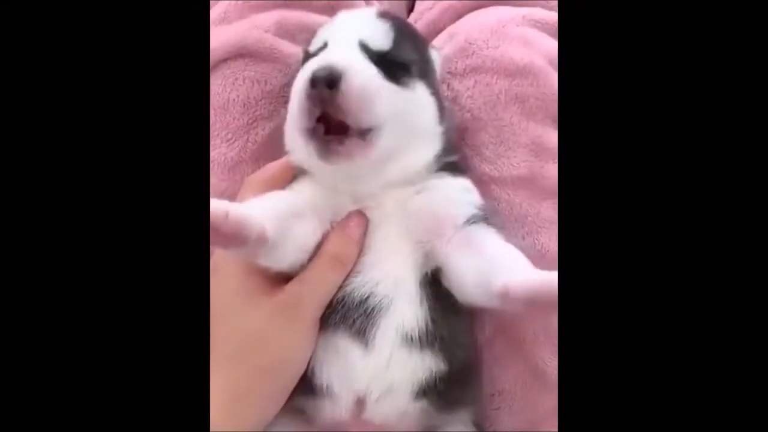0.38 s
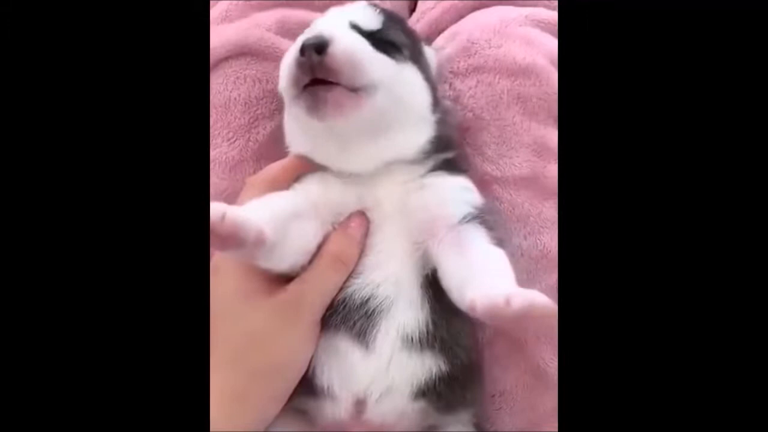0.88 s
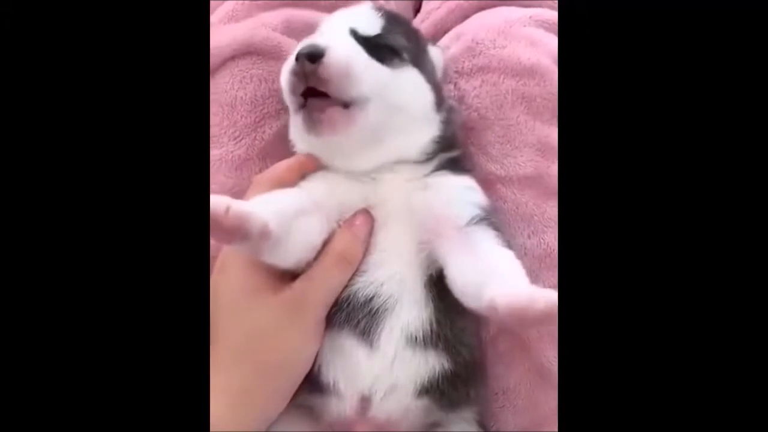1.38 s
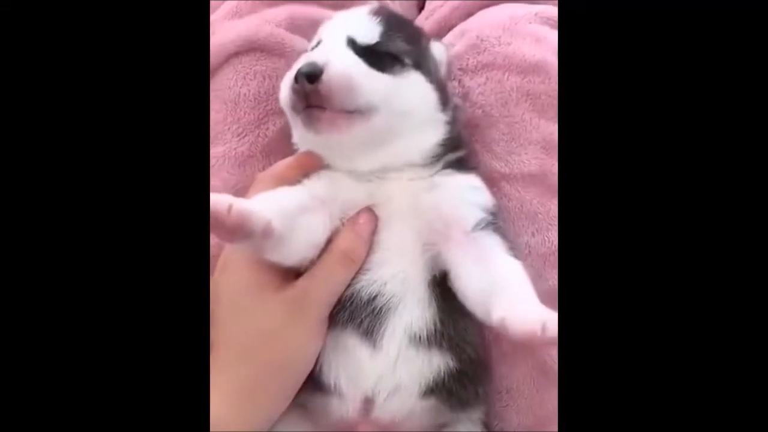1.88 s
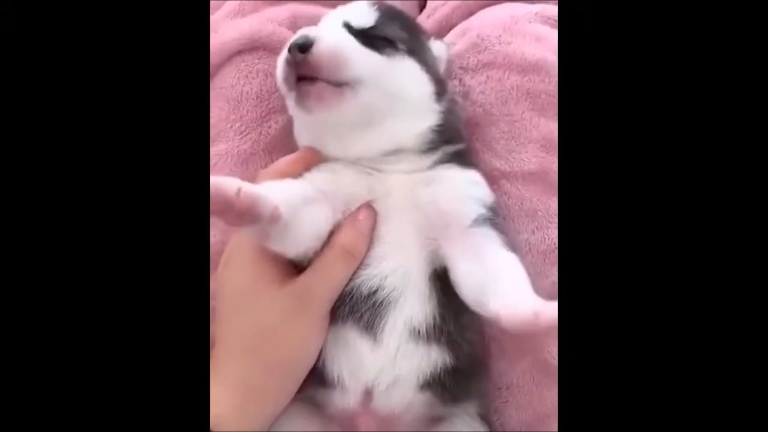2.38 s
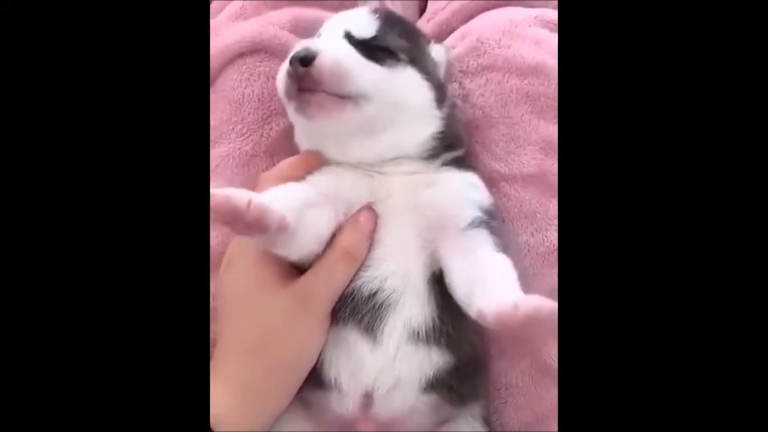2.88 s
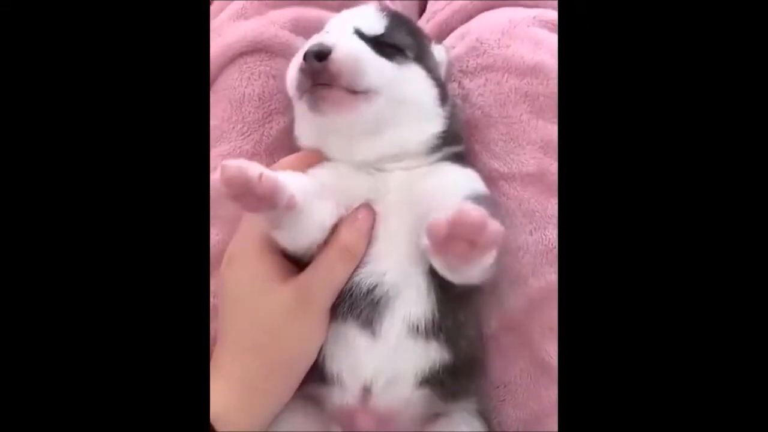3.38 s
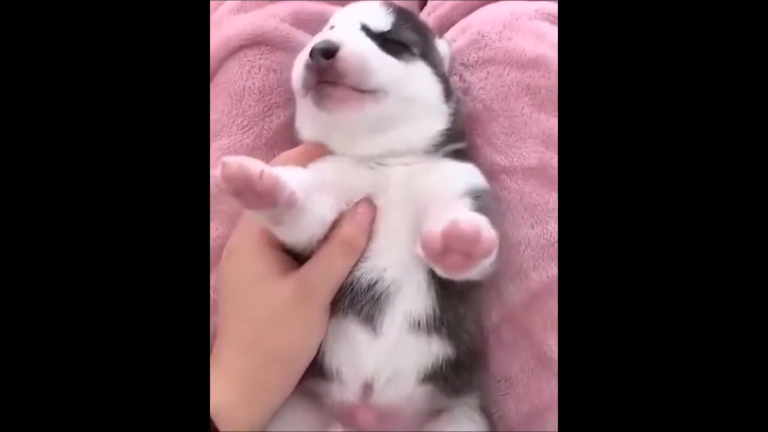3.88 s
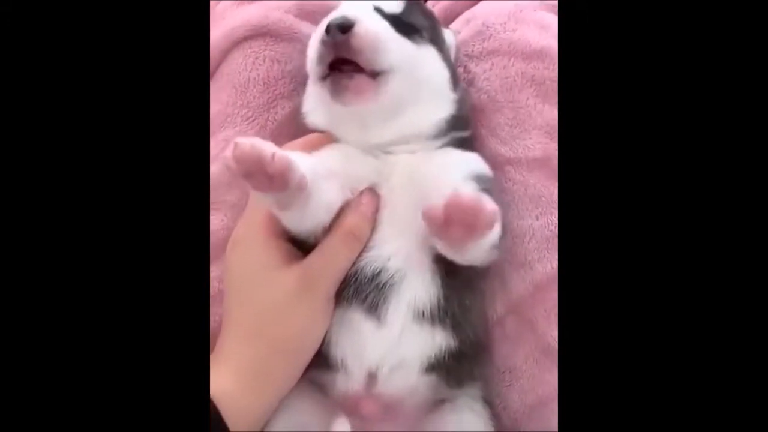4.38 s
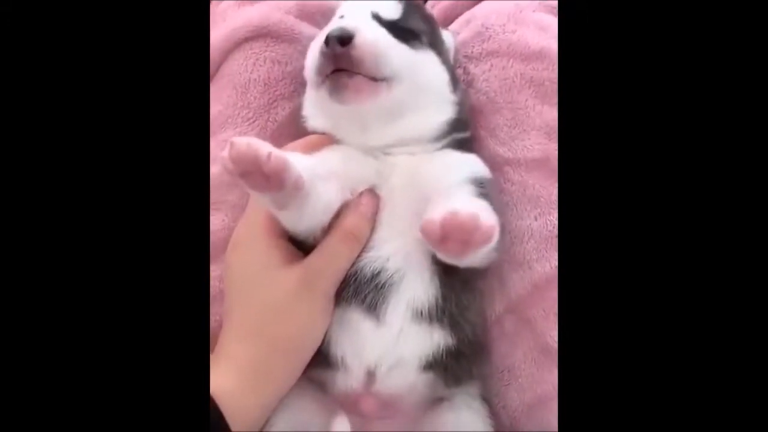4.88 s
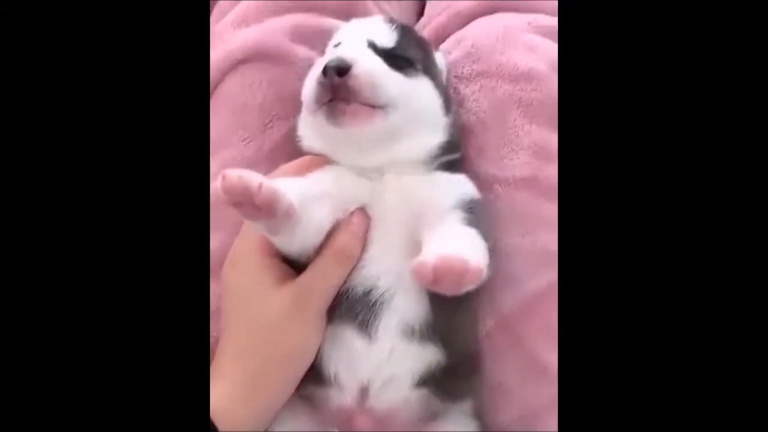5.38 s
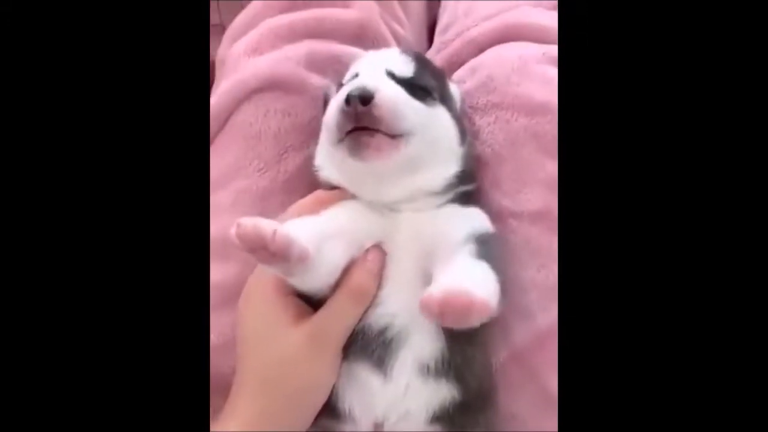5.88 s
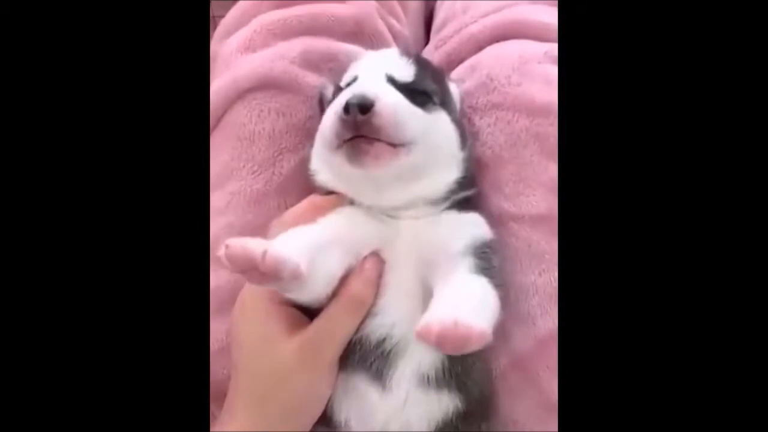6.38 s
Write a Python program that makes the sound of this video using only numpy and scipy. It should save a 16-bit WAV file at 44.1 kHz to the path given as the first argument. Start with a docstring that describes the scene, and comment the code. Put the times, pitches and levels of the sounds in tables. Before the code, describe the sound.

A very young puppy gives five short, close howls, each yelping high, thinning to a whistle, then breaking into a lower, raspy moan indoors.

```python
"""A very young puppy howls five times, close to a phone in a quiet room.
Three calls start with a creak; all yelp, hold a thin whistle, break into a lower voice and end in a rasp.
The voice is a stack of sine partials that waver, plus breath noise puffed once a cycle.
A soft room answers briefly as a fading noise tail; steady air noise and a mains hum sit underneath."""
import sys
import numpy as np
from scipy import signal
from scipy.fft import rfft, irfft
from scipy.io import wavfile
from scipy.ndimage import uniform_filter1d

SR = 44100
rng = np.random.default_rng(int(sys.argv[2]) if len(sys.argv) > 2 else 0)


def voltage_ratio(decibels):
    """Convert decibels (scalar or array-like) to amplitude ratios, 20 dB per decade."""
    exponent = np.asarray(decibels, float) / 20
    return 10 ** exponent


def to_wav(s):
    """Save 16-bit WAV."""
    ch = np.atleast_2d(s).T  # columns
    pcm = np.round(np.clip(ch, -1, 1) * 32767)  # PCM
    wavfile.write(sys.argv[1], SR, pcm.astype(np.int16))


N = 287532  # length in samples, about 6.5 s


def unit(x):
    """Scales a sound to rms 1."""
    return x / np.sqrt(np.mean(x ** 2))


def at(table, hz):
    """Reads dB from a (Hz, dB) table, in straight lines on a log-frequency axis."""
    table_hz, db = np.transpose(table)
    return np.interp(np.log(hz), np.log(table_hz), db)


def noise(table):
    """Random noise shaped by a spectrum table, rms 1."""
    hz = np.maximum(np.arange(N // 2 + 1) * SR / N, 1)
    return unit(irfft(rfft(rng.standard_normal(N)) * voltage_ratio(at(table, hz)), N))


def wobble(hz):
    """Smooth random movement no faster than about hz, rms 1."""
    lowpass = signal.butter(2, hz, fs=SR, output="sos")
    return unit(signal.sosfilt(lowpass, rng.standard_normal(N)))


# Colour of the room air; only the shape counts. Each row: frequency in Hz, density in dB per Hz.
AIR_COLOUR = [(12, -47.5), (20, -29), (36, -11.5), (102, -13), (129, -19.5), (174, -22.5), (273, -18.5),
              (296, -19.5), (386, -20), (441, -26), (883, -26), (3090, -41.5), (11700, -46), (15300, -78),
              (22000, -120)]


def air():
    """Room air: shaped noise whose level slowly swells and sinks."""
    level_db, swell_db, swell_hz = -62.5, 1.7, 2.2
    return voltage_ratio(level_db + swell_db * wobble(swell_hz)) * noise(AIR_COLOUR)


# Mains hum. Each row: frequency in Hz, middle rms level in dB.
HUM_TONES = [(100.2, -65)]


def mains_hum():
    """Mains hum: a steady sine pitch with a slightly wavering level."""
    t = np.arange(N) / SR
    waver_db, waver_hz = 0.59, 3
    hum = 0
    for hz, db in HUM_TONES:
        level = np.sqrt(2) * voltage_ratio(db + waver_db * wobble(waver_hz))
        hum = hum + level * np.sin(2 * np.pi * hz * t)
    return hum


def room(x):
    """Room echo: many dense reflections, heard as a dull noise tail that fades quickly."""
    level_db, t60_s, top_hz, fade_in_s = -22, 0.33, 3220, 0.0028
    t = np.arange(int(.6 * SR)) / SR
    tail = rng.standard_normal(len(t)) * np.exp(-np.log(1000) * t / t60_s)
    tail *= np.clip(t / fade_in_s, 0, 1)
    tail = signal.sosfilt(signal.butter(1, top_hz, fs=SR, output="sos"), tail)
    return voltage_ratio(level_db) * signal.fftconvolve(x, tail / np.linalg.norm(tail))[:N]


# Bands the nose swallows. Each row: centre in Hz, width in Hz, share taken out from 0 to 1.
NOSE_BANDS = [(2680, 350, .7), (3950, 600, .75)]


def nose(x):
    """The nasal branch of the airway takes a share out of each band where it resonates."""
    for hz, width_hz, share in NOSE_BANDS:
        x = x - share * signal.lfilter(*signal.iirpeak(hz, hz / width_hz, fs=SR), x)
    return x


# Colour of the breath; only the shape counts. Each row: frequency in Hz, density in dB per Hz.
BREATH_COLOUR = [(530, -41), (900, -25.5), (1190, -3.5), (1340, -2), (1810, -2.5), (2100, -38.5),
                 (2470, -31), (2720, -20), (3000, -21), (3720, -29), (4050, -34), (6640, -32),
                 (7640, -31.5), (9680, -32), (11700, -55.5), (15300, -75), (22000, -120)]


def breath_hiss(phase):
    """Breath: noise that swells once per voice cycle and crackles a little, rms 1."""
    puff_depth, crackle_db, crackle_hz = 0.13, 1, 50
    puffs = noise(BREATH_COLOUR) * (1 + puff_depth * np.cos(phase))
    puffs *= voltage_ratio(crackle_db * wobble(crackle_hz))
    highpass = signal.butter(4, 2400, "high", fs=SR, output="sos")
    return unit(nose(signal.sosfilt(highpass, puffs)))


# Head voice, third and fourth partial against the treble. Each row: frequency in Hz, level in dB.
HEAD_PARTIALS = [(2300, -20), (3500, -0.5), (4050, 2.5), (4300, -6.5), (4600, -5), (5300, -2.5),
                 (7000, -10.5)]


def head(rows):
    """Head voice, thin and high: two partials are given, the third and fourth follow the treble."""
    s, hz, first, second, treble = np.transpose(rows)
    third = treble + at(HEAD_PARTIALS, 3 * hz)
    fourth = treble + at(HEAD_PARTIALS, 4 * hz) - 6
    silent = [0 * s - 120] * 3  # partials five to seven
    return np.array([s, hz, first, second, third, fourth, *silent, treble])


def chest(rows, shape, ring=(3000, 500, -10)):
    """Chest voice, low and full: throat and mouth resonances share the level among partials 2 to 4."""
    first_db, throat_hz, throat_db, mouth_width_hz, fall_db = shape
    ring_hz, ring_width_hz, ring_db = ring
    rows = np.transpose(rows)
    s = np.arange(rows[0, 0], rows[0, -1], .002)
    hz, db, mouth_hz, treble = (np.interp(s, rows[0], column) for column in rows[1:])

    def peak(f, centre, width):
        return 1 / (1 + (2 * (f - centre) / width) ** 2)

    f = hz * np.array([[2], [3], [4]])
    power = peak(f, mouth_hz, mouth_width_hz) + voltage_ratio(2 * throat_db) * peak(f, throat_hz, 100)
    power = power * voltage_ratio(-2 * fall_db * np.log2(np.maximum(f / mouth_hz, 1)))
    power = voltage_ratio(2 * db) * power / power.sum(axis=0)
    power = np.vstack([power, np.zeros((3, len(s)))])
    # a higher ring lifts partials 2 to 7; squaring makes its peak narrower
    f = hz * np.arange(2, 8)[:, None]
    power = power + voltage_ratio(2 * (treble + ring_db)) * peak(f, ring_hz, ring_width_hz) ** 2
    # the first partial sinks only where the level is far below its loudest
    fade = np.clip(db - db.max() + 14, -30, 0)
    return np.array([s, hz, first_db + fade, *(10 * np.log10(power)), treble])


# Creaky starts. Each row: start in seconds, length in seconds, pitch in Hz, level at the end in dB,
# mouth resonance in Hz.
CREAK_STARTS = [(2.206, .025, 340, -35.5, 1130), (4.229, .034, 383, -38, 1100),
                (5.503, .04, 393, -35.5, 1217)]
# One row: first partial in dB, throat resonance in Hz, its dB against the mouth's, mouth width in Hz,
# fall above the mouth in dB per octave (below zero it rises).
CREAK_RESONANCES = (-44, 758, -16, 395.5, -12)


def creaks():
    """Creaks: short, very rough chest notes that swell at a steady pitch."""
    swell_db, treble_db = 5.5, -31  # treble against the level at the end
    roughness, breath_db = .8, 0
    stretches = []
    for start, length, hz, db, mouth_hz in CREAK_STARTS:
        rows = [(start, hz, db - swell_db, mouth_hz, db + treble_db),
                (start + length, hz, db, mouth_hz, db + treble_db)]
        stretches.append((chest(rows, CREAK_RESONANCES), roughness, breath_db))
    return stretches


# Run-ups to the yelps, one list each. Each row: time in seconds, pitch in Hz, first partial in dB,
# second partial in dB, treble in dB.
RUNUP_NOTES = [
    [(0.414, 1161, -43.5, -58.5, -60), (0.42, 1058, -28.5, -58.5, -63), (0.424, 1110, -29.5, -65, -51),
     (0.434, 1347, -27.5, -36.5, -40), (0.438, 1315, -16.5, -40, -46)],
    [(0.443, 1181, -25.5, -18.5, -28.5), (0.451, 1132, -30.5, 1.5, -28.5), (0.459, 1243, -22, -22, -37.5)],
    [(2.238, 931.5, -38, -52, -71.5), (2.254, 952.2, -29.5, -26.5, -49), (2.262, 1024, -25.5, -27.5, -46.5),
     (2.27, 1209, -25, -31, -39)],
    [(3.07, 1073, -44.5, -62, -89.5), (3.076, 1050, -39.5, -54.5, -77), (3.084, 1082, -29, -57, -83.5),
     (3.095, 1061, -52, -76.5, -67.5)],
    [(3.101, 1057, -29, -55.5, -69.5), (3.109, 897, -38, -37, -66.5), (3.117, 901.3, -31, -29, -44.5),
     (3.131, 1053, -28.5, -28.5, -43), (3.137, 1101, -32.5, -43, -44.5)],
    [(4.275, 751, -32.5, -32.5, -60), (4.283, 770.4, -32.5, -35, -62), (4.303, 1008, -32.5, -27.5, -46.5),
     (4.329, 1195, -29, -15.5, -27.5), (4.343, 1192, -23.5, -16, -28), (4.351, 1232, -25.5, -23, -22)],
    [(5.551, 758.2, -28, -36, -59), (5.561, 812.6, -32.5, -34, -61), (5.573, 988.5, -32, -33, -47),
     (5.595, 1122, -28, -20, -35.5), (5.613, 1165, -35.5, -17, -30), (5.628, 1155, -26, -22, -23.5)],
]


def runups():
    """Run-ups: a slightly rough, breathy head voice that leads to the yelp."""
    return [(head(rows), .008, -.6) for rows in RUNUP_NOTES]  # roughness, breath in dB


# Five yelps that thin to a whistle, and one brief flip back into head voice, one list each.
# Each row: time in seconds, pitch in Hz, first partial in dB, second partial in dB, treble in dB.
HIGH_NOTES = [[(0.464, 1475, -9.5, -23, -26), (0.478, 1532, -7, -25.5, -24), (0.488, 1646, -2, -46, -29),
              (0.496, 1698, -2, -46, -22.5), (0.506, 1750, -5, -36, -35), (0.518, 1573, -15.5, -68, -41.5),
              (0.524, 1615, -11.5, -48, -28), (0.532, 1702, -14, -55, -40), (0.54, 1800, -17.5, -39, -31),
              (0.546, 1805, -12.5, -37, -41), (0.556, 1700, -11, -64, -46), (0.564, 1610, -13, -48, -27),
              (0.582, 1746, -16, -45, -53), (0.608, 1650, -16.5, -57, -48), (0.63, 1864, -31.5, -48, -61),
              (0.642, 1707, -27.5, -55, -65), (0.668, 1865, -35.5, -46, -75),
              (0.682, 1844, -40.5, -47, -95), (0.7, 1810, -41, -53, -76)] + [(0.72, 1775, -45, -63, -79),
              (0.77, 1750, -40, -62, -96), (0.794, 1752, -41, -65.5, -87), (0.886, 1726, -38.5, -56.5, -91),
              (0.934, 1727, -44, -61, -82), (0.994, 1705, -42, -57.5, -90), (1.05, 1704, -38.5, -52, -79),
              (1.058, 1600, -36, -60, -69), (1.09, 1466, -35.5, -50, -66),
              (1.116, 1423, -23.5, -35.5, -59.5), (1.208, 1452, -26, -42, -57),
              (1.238, 1353, -21, -47, -59), (1.268, 1148, -31.5, -45, -57)],
              [(2.275, 1462, -9.5, -31.5, -24.5), (2.289, 1506, -7, -23.5, -16),
              (2.301, 1387, -13.5, -13, -19), (2.311, 1523, -9, -21.5, -19), (2.323, 1511, -10, -15, -15.5),
              (2.333, 1518, -15, -48.5, -18.5), (2.341, 1536, -17.5, -28, -25.5),
              (2.367, 1516, -23.5, -43, -32), (2.383, 1398, -29.5, -38, -48),
              (2.4, 1382, -28.5, -39, -50)] + [(2.42, 1321, -30.5, -41, -48),
              (2.448, 1308, -35, -43, -52.5), (2.462, 1306, -32.5, -39.5, -57), (2.54, 1301, -33, -41, -60),
              (2.564, 1228, -35, -44, -57.5), (2.602, 1272, -30.5, -43.5, -59),
              (2.634, 1279, -32.5, -53, -58), (2.66, 1247, -36, -46, -68), (2.677, 1220, -31.5, -49, -61)],
              [(3.143, 1410, -23, -35, -31), (3.149, 1446, -13, -24.5, -25.5),
              (3.161, 1548, -2.5, -17.5, -20.5), (3.177, 1558, -5, -26, -15.5),
              (3.185, 1472, -12.5, -41.5, -19.5), (3.191, 1568, -4.5, -32.5, -21),
              (3.197, 1633, -4.5, -57.5, -30), (3.201, 1664, -6, -48, -32.5),
              (3.213, 1664, -12, -61, -34.5), (3.235, 1565, -42, -58, -35.5), (3.239, 1604, -24, -68, -35),
              (3.243, 1626, -19, -56, -33.5), (3.257, 1554, -27.5, -38, -35.5),
              (3.281, 1422, -31.5, -40.5, -43),
              (3.3, 1398, -26, -41, -47.5)] + [(3.32, 1368, -32.5, -45, -51.5),
              (3.412, 1343, -33.5, -46, -55.5), (3.47, 1340, -30, -48, -56), (3.502, 1379, -30, -47, -56),
              (3.526, 1368, -29, -44.5, -63), (3.548, 1377, -30, -52, -59.5),
              (3.568, 1351, -36, -47, -62.5), (3.584, 1346, -30.5, -57, -60),
              (3.65, 1338, -33.5, -49, -58)], [(4.356, 1483, -14, -34, -23.5),
              (4.362, 1547, -4, -34.5, -25.5), (4.372, 1542, -12.5, -36, -29.5),
              (4.386, 1524, -33, -53, -36.5), (4.408, 1543, -23, -60, -33.5),
              (4.418, 1522, -24.5, -56, -45), (4.432, 1385, -30, -40, -47.5),
              (4.474, 1307, -33.5, -40, -57), (4.524, 1333, -34, -40, -57.5),
              (4.558, 1379, -27.5, -52, -65), (4.58, 1306, -34, -41, -61.5), (4.624, 1338, -24.5, -51, -65),
              (4.662, 1330, -32, -45, -64), (4.724, 1322, -31.5, -53, -64.5), (4.745, 1322, -38, -39, -63)],
              [(5.634, 1473, -23, -37, -30), (5.642, 1458, -19, -39, -34.5), (5.656, 1543, -17.5, -52, -36),
              (5.69, 1520, -27, -45.5, -48.5), (5.722, 1330, -29, -43, -49.5),
              (5.758, 1299, -37, -46.5, -58), (5.802, 1363, -30, -43.5, -65), (5.832, 1401, -30, -58, -66),
              (5.848, 1360, -29.5, -47, -60.5), (5.904, 1349, -33, -50, -67.5),
              (5.927, 1314, -30, -55, -61)], [(5.97, 1326, -24.5, -51, -60), (5.984, 1334, -30, -64, -60),
              (5.996, 1347, -27, -72, -59)]]


def yelps_and_flip():
    """Five yelps that thin to a whistle, and one brief flip back up, all in a clear head voice."""
    return [(head(rows), .002, -1.5) for rows in HIGH_NOTES]  # roughness, breath in dB


# Low stretches, one list each. Each row: time in seconds, pitch in Hz, level in dB,
# mouth resonance in Hz, treble in dB.
CHEST_NOTES = [
    [(1.274, 515, -29, 1520, -58), (1.284, 497, -21.5, 1480, -55), (1.293, 473, -27, 1450, -56)],
    [(1.3, 926.5, -36, 1800, -52), (1.315, 880, -29.5, 1693, -58), (1.33, 818, -19.5, 1630, -63),
     (1.355, 760, -30.5, 1570, -56), (1.37, 714, -34.5, 1498, -54.5),
     (1.395, 660, -36, 1882, -56)] + [(1.42, 611.2, -36, 1576, -57), (1.432, 594, -33.5, 1530, -55.5),
     (1.46, 599, -35.5, 1500, -58.5), (1.492, 635, -34, 1610, -57), (1.512, 728, -28.5, 1570, -57.5),
     (1.54, 734, -35.5, 1494, -54), (1.58, 742, -31, 1480, -57), (1.628, 698, -31, 1410, -59),
     (1.646, 698, -25, 1364, -56), (1.672, 713, -28, 1420, -52.5), (1.706, 690, -30, 1365, -57.5),
     (1.72, 678, -34.5, 1403, -59.5), (1.762, 590.0, -34.5, 1470, -60), (1.818, 532.6, -33, 1552, -60),
     (1.866, 485, -33.5, 1518, -61.5), (1.9, 463, -39, 1470, -59)],
    [(2.684, 531.2, -29.5, 1558, -54.5), (2.72, 504.7, -30, 1520, -54.5), (2.754, 534.2, -28, 1637, -53.5),
     (2.766, 622.6, -35.5, 1614, -52), (2.788, 617.4, -33.5, 1540, -63), (2.824, 432.0, -39.5, 1480, -61)],
    [(3.655, 655.4, -30.5, 1820, -53), (3.697, 644.5, -30.5, 1860, -54), (3.737, 628.4, -23, 1910, -54),
     (3.757, 612.2, -24, 1844, -50.5), (3.779, 599.9, -22.5, 1800, -49), (3.815, 633.7, -24.5, 1896, -46),
     (3.825, 561.9, -21.5, 1700, -59), (3.863, 528.3, -30.5, 1678, -52), (3.889, 413.8, -34, 1680, -59),
     (3.933, 375, -30.5, 1570, -58.5), (3.957, 323.3, -39.5, 1459, -52.5), (3.988, 279.7, -45.5, 1512, -75)],
    [(4.75, 647.8, -29, 1885, -52), (4.764, 645.2, -28.5, 1880, -56), (4.782, 642.3, -26, 1773, -53),
     (4.79, 578.7, -23, 1773, -58), (4.85, 581, -23.5, 1738, -53.5), (4.88, 592.8, -22.5, 1790, -55),
     (4.93, 577.8, -23.5, 1796, -53.5), (4.96, 540.5, -26, 1840, -49.5), (4.986, 572, -26, 1745, -53.5),
     (5.01, 527.6, -25, 1820, -48), (5.108, 492.1, -25.5, 1960, -53.5), (5.128, 476.3, -31.5, 1819, -53),
     (5.18, 459, -30.5, 1860, -53.5), (5.194, 445.8, -27, 1890, -54.5), (5.214, 411, -31.5, 1850, -56),
     (5.224, 404, -27.5, 1823, -64.5), (5.236, 425.5, -34, 1800, -54.5), (5.264, 404.7, -42, 1897, -71)],
    [(5.934, 432.7, -30, 1730, -53), (5.94, 429.7, -18.5, 1757, -56), (5.961, 446, -31.5, 1750, -53)],
    [(6.003, 567, -24.5, 1705, -55), (6.015, 565.4, -23, 1663, -65), (6.029, 576.5, -23, 1683, -56),
     (6.179, 605.7, -23.5, 1910, -50.5), (6.219, 605.6, -26.5, 1780, -52), (6.229, 598.3, -29, 1810, -50),
     (6.299, 601.2, -29, 1780, -46.5), (6.311, 541.4, -29.5, 1860, -52), (6.341, 517.7, -26, 1983, -47),
     (6.387, 481.2, -30, 1914, -49.5), (6.415, 489.3, -29, 1920, -52), (6.431, 482, -33, 1858, -57.5),
     (6.447, 373.6, -28, 1910, -60), (6.47, 365.4, -43, 1884, -58.5)],
]
# Each row, one per stretch: first partial in dB, throat resonance in Hz, its dB against the mouth's,
# mouth width in Hz, fall above the mouth in dB per octave.
CHEST_RESONANCES = [(-44.5, 1000, -8, 250, 10), (-35, 1020, 4, 130, 13.5), (-43, 1000, 1, 250, 16),
                    (-41.5, 745, -3, 150, 55), (-43, 955, -1.5, 233, 19.5), (-39.5, 900, -34, 180, 3),
                    (-44.5, 780, 6, 214, 16)]
# Higher ring of each stretch. Each row: centre in Hz, width in Hz before squaring, dB against the treble.
CHEST_RINGS = [(3500, 500, 5), (3537, 277, 6.5), (3200, 512, -11), (3167, 320, -3.5), (2820, 323, 8),
               (3000, 500, -14), (3239, 464, 7.5)]
# Breath in the treble in dB, one number per stretch.
CHEST_BREATH = [-1, -1.5, -3.5, -4.5, -2.5, -2, -2.5]


def chest_stretches():
    """Low stretches: the voice has broken into the chest register, nearly smooth."""
    stretches = []
    for rows, shape, ring, breath_db in zip(CHEST_NOTES, CHEST_RESONANCES, CHEST_RINGS, CHEST_BREATH):
        stretches.append((chest(rows, shape, ring), .001, breath_db))  # .001 is the roughness
    return stretches


def pitch_and_levels(notes):
    """Links stretches by glides; a register break jumps in pitch through a short dip."""
    release_s, waver_db, waver_hz = .012, 1, 26.2
    t = np.arange(N) / SR
    s, *columns = np.hstack(notes)
    track = np.array([np.interp(t, s, column) for column in columns])
    on = np.ones(N)
    on[:int(s[0] * SR)] = 0
    on *= np.exp(-np.maximum(t - s[-1], 0) / release_s)
    reach = int(.005 * SR)
    for last, first in zip(notes, notes[1:]):
        a, b = int(last[0, -1] * SR), int(first[0, 0] * SR)
        pause = b - a > 10 * reach
        if pause or abs(np.log(first[1, 0] / last[1, -1])) > .13:
            middle, dip = (a + b) // 2, reach // 5
            track[:, a:middle] = track[:, a:a + 1]
            track[:, middle:b] = track[:, b:b + 1]
            on[middle - dip:middle + dip] = .25
        if pause:
            on[a:b] = np.exp(-t[:b - a] / release_s)  # the voice dies away after a call
    # the levels never hold quite still; the first partial and the treble move half as much
    waver = np.array([k * waver_db * wobble(waver_hz) for k in (1, 2, 2, 2, 2, 2, 2, 1)])
    gains = uniform_filter1d(voltage_ratio(track[1:] + waver) * on, size=110, axis=1)
    return track[0], gains[:-1], gains[-1]


# Whistles. Each row: start in seconds, end in seconds.
WHISTLE_TIMES = [(.68, 1.268), (2.36, 2.68), (3.28, 3.652), (4.43, 4.747), (5.72, 5.93)]
# Rougher or breathier moments. Each row: start in seconds, end in seconds, roughness from 0 to 1,
# swell time in seconds.
ROUGHER_TIMES = [(.44, .63, .003, .01), (1.268, 1.315, .02, .01), (1.87, 1.95, .3, .02),
                 (2.75, 2.87, .45, .02), (3.82, 3.94, .02, .01), (3.93, 4.03, .35, .035),
                 (3.096, 3.108, .6, .002), (4.747, 4.785, .015, .01), (5.15, 5.31, .3, .04),
                 (5.93, 6.0, .025, .02), (6.21, 6.31, .25, .025), (6.3, 6.4, .015, .01),
                 (6.37, 6.52, .25, .05)]
# Every second cycle weaker. Each row: start in seconds, end in seconds, depth from 0 to 1.
UNEVEN_TIMES = [(.41, .435, .3), (1.296, 1.315, .5), (1.42, 1.55, .5), (1.73, 1.83, .28), (2.76, 2.84, .2),
                (3.82, 4.0, .12), (5.19, 5.28, .2), (5.965, 6.1, .2), (6.225, 6.305, .1), (6.4, 6.5, .2)]


def voice_quality(stretches):
    """How rough, uneven and breathy the voice is: whistles are smooth, other moments rougher or breathier."""
    t = np.arange(N) / SR
    starts = [notes[0, 0] - .004 for notes, _, _ in stretches]
    which = np.maximum(np.searchsorted(starts, t) - 1, 0)
    rough, breath_db = np.array([quality for _, *quality in stretches])[which].T
    uneven = sum(depth * ((t > a) & (t < b)) for a, b, depth in UNEVEN_TIMES)
    for a, b in WHISTLE_TIMES:
        inside = (t > a) & (t < b)
        rough = np.where(inside, .0003, rough)
        breath_db = np.where(inside, -10, breath_db)
    for a, b, amount, swell_s in ROUGHER_TIMES:
        grown = np.clip((t - a) / swell_s, 0, 1) ** 2 * (t < b)
        rough = np.maximum(rough, amount * grown)
        breath_db = breath_db * (1 - grown / 2)
    rough, uneven, breath_db = uniform_filter1d([rough, uneven, breath_db], size=700, axis=1)
    return np.clip(rough, 0, 1), np.clip(uneven, 0, 1), breath_db


# Throat colour of the upper partials; only the shape counts. Each row: frequency in Hz, level in dB.
THROAT_COLOUR = [(1180, -13.5), (2000, -5.5), (2460, -25), (3100, -32), (3700, -25.5), (4040, -26),
                 (4420, -33), (4970, -28.5), (5680, -29.5), (6030, -27.5), (6590, -29.5), (7870, -24.5),
                 (8540, -32), (9400, -31), (11700, -44), (15300, -84), (22000, -120)]


def upper_partials(hz, phase, flutter, fourth):
    """Partials 5 to 39, coloured by the throat, and a skirt that falls away from the fourth partial."""
    top_hz, skirt_db = 11530, 13.5  # the skirt falls this much per partial
    shimmer_db, shimmer_hz = 9, 10
    orders = np.arange(5, 40)
    coarse_hz = hz[::64] * orders[:, None]
    shape = voltage_ratio(at(THROAT_COLOUR, coarse_hz)) * (coarse_hz < top_hz)
    shape /= np.sqrt(np.sum((shape * (coarse_hz > 4200)) ** 2, axis=0)) + 1e-9
    shimmer = [voltage_ratio(shimmer_db * np.tanh(wobble(shimmer_hz))) for _ in range(11)]  # they come and go
    upper = skirt = 0
    for k, row in zip(orders, shape):
        sine = np.sin(k * phase + k * k)
        upper = upper + np.repeat(row, 64)[:N] * shimmer[k % 11] * flutter[k % 5] * sine
        skirt = skirt + fourth * voltage_ratio(-skirt_db * (k - 4)) * flutter[-k % 5] * (k * hz < top_hz) * sine
    return upper, skirt


def puppy():
    """The puppy's voice: partials whose cycles waver in length and strength, with puffed breath."""
    jitter, flutter_hz, tremble, tremble_hz = 0.079, 223.4, .003, 60  # pitch shares; jitter if fully rough
    smear_share, smear_hz = .2, 330
    stretches = creaks() + runups() + yelps_and_flip() + chest_stretches()
    stretches.sort(key=lambda stretch: stretch[0][0, 0])  # by start time
    hz, low, treble = pitch_and_levels([notes for notes, _, _ in stretches])
    rough, uneven, breath_db = voice_quality(stretches)
    waver = jitter * np.sqrt(rough) * wobble(flutter_hz) + tremble * wobble(tremble_hz)
    phase = 2 * np.pi * np.cumsum(hz * (1 + waver)) / SR
    # a rough voice blurs its partials: five separate flutters are shared out among them
    flutter = [np.sqrt(1 - rough) + np.sqrt(rough) * wobble(flutter_hz) for _ in range(5)]
    voice = sum(gain * flutter[k % 5] * np.sin(k * phase + k * k) for k, gain in enumerate(low, 1))
    # at high pitch the low partials already fill part of the treble
    filled = sum(gain ** 2 * (k * hz > 4200) for k, gain in enumerate(low, 1))
    treble = np.sqrt(np.maximum(treble ** 2 - filled, treble ** 2 / 10))
    upper, skirt = upper_partials(hz, phase, flutter, low[3])
    # part of the breath clings to the upper partials, the rest is free hiss
    breath = np.minimum(voltage_ratio(breath_db), 1)
    clinging = breath * np.sqrt(smear_share) * np.tanh(wobble(smear_hz))
    voice += nose(skirt + treble * upper * (np.sqrt(1 - breath ** 2) + clinging))
    # strong and weak cycles in turn give tones half-way between the partials
    voice *= (1 + uneven * np.sqrt(2) * np.cos(phase / 2)) / np.sqrt(1 + .5 * uneven)
    hiss = treble * breath * np.sqrt(1 - smear_share) * breath_hiss(phase)
    return np.sqrt(2) * voice + hiss


def scene():
    """The puppy, the room's answer, and the air and hum underneath, in one channel."""
    dog = puppy()
    return (dog + room(dog) + air() + mains_hum())[None]


def band_limit(x):
    """A steep low-pass at the top of the band."""
    return signal.sosfilt(signal.butter(12, 11890, fs=SR, output="sos"), x)


def record(dry):
    """Loud yelps push the microphone off centre (a soft thump); the phone rounds peaks and cuts the top."""
    overload, top_hz = 0.0072, 11530
    thump_band = signal.butter(2, (20, 250), "band", fs=SR, output="sos")
    loud = dry + overload * signal.sosfilt(thump_band, dry ** 2)
    rounded = loud / (1 + loud ** 8) ** (1 / 8)
    mix = signal.sosfilt(signal.ellip(8, .2, 60, top_hz, fs=SR, output="sos"), rounded)
    mix = np.clip(mix, -1, 1)
    return band_limit(mix)


dry = scene()
out = record(dry)
to_wav(out)
```